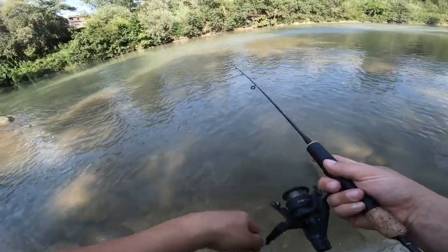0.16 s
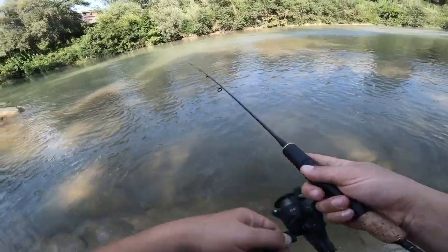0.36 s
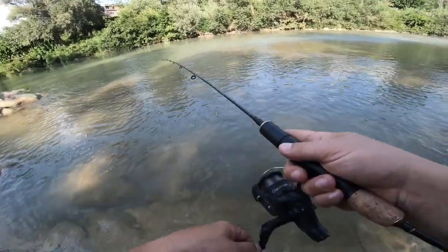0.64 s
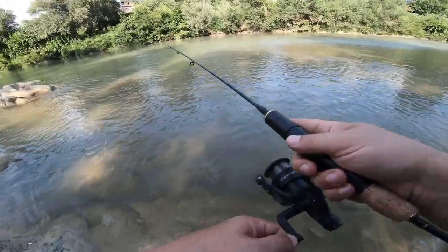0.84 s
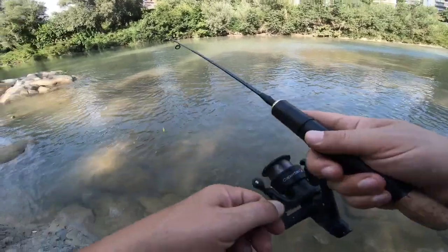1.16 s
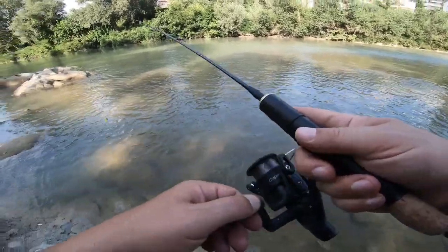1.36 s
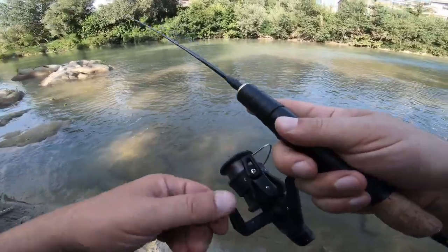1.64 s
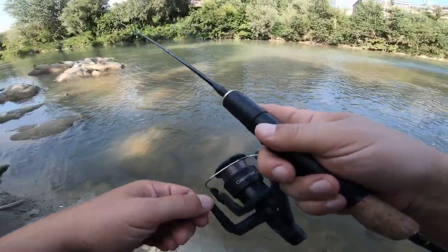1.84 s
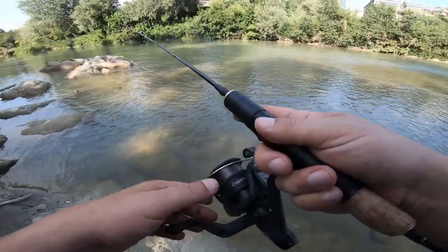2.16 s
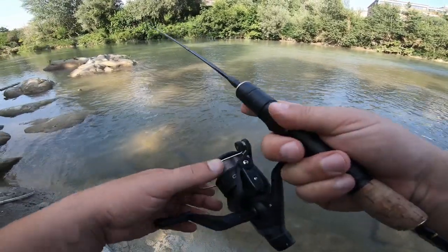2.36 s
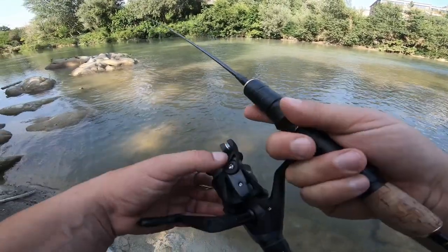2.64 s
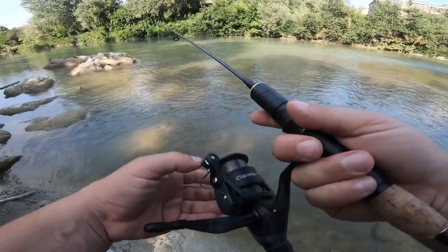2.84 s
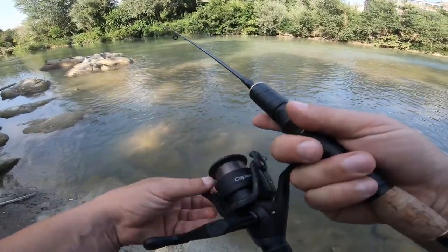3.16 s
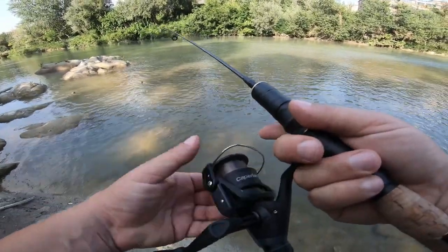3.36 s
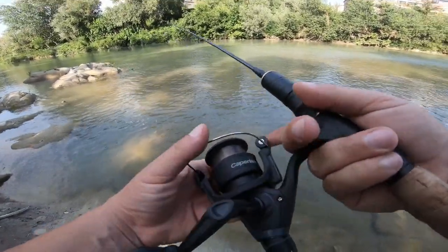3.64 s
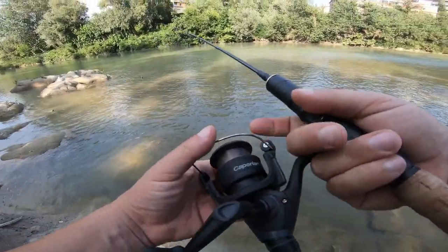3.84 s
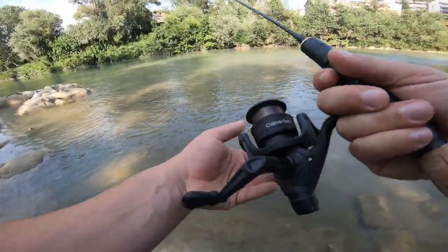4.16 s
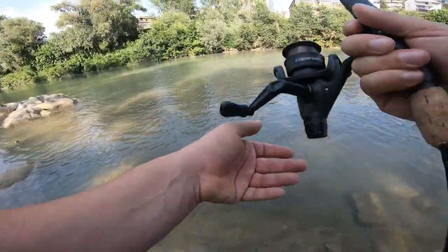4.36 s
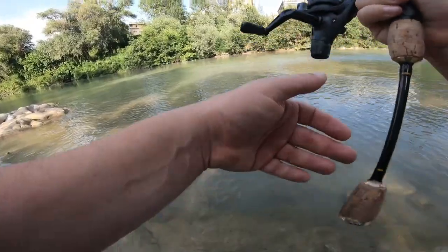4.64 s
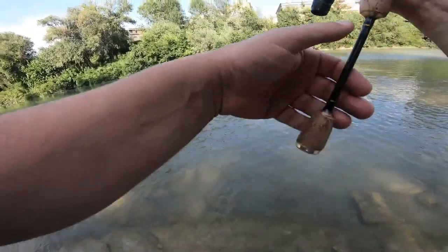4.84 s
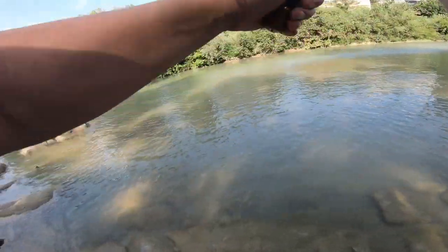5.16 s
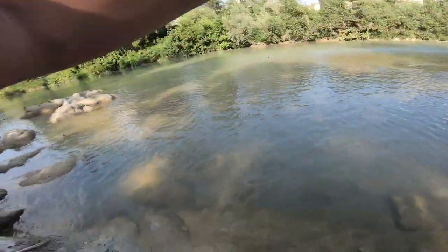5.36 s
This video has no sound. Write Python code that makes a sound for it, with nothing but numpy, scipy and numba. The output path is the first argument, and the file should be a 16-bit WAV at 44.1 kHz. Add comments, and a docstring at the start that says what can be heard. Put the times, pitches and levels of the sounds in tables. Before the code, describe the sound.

Outdoor riverbank heard from a camera worn on the chest, in stereo. A dense high cicada chorus runs throughout, with a nearer cicada pulsing quickly on the left, then swinging right late as the wearer turns. A low river rush and faint breeze sit beneath. A hard knock comes near two seconds, then small reel ticks, a sharp clack just past four, and a cast starting at the very end.

```python
"""A river bank in summer, heard at two microphone ports of a camera worn on the chest.
From the start a far chorus of cicadas drones as resonance-filtered noise and a nearer one throbs over it;
a river rushes low with two wavering hums, a higher singer soon fades out, and a light breeze gusts.
Later a fishing reel clicks as contact bursts ring its modes, and knocks ring the camera case.
Twice the wearer turns; at the very end the swish of a cast, broad filtered noise, begins."""
import sys
import numpy as np
from scipy import signal
from scipy.fft import rfft, irfft, next_fast_len
from scipy.io import wavfile
from scipy.ndimage import uniform_filter1d
from numba import njit

SR = 44100
rng = np.random.default_rng(int(sys.argv[2]) if len(sys.argv) > 2 else 0)


def pcm_store(signal):
    """Save signal as 16-bit PCM."""
    levels = np.round(np.clip(np.atleast_2d(signal), -1, 1) * 32767)
    wavfile.write(sys.argv[1], SR, levels.astype(np.int16).T)


def ratio(d):
    """dB to gain"""
    e = np.asarray(d, float) / 20
    return 10 ** e


N = 242991
T = np.arange(N) / SR  # s
SIZE = next_fast_len(N + SR // 10)  # transform length, padded against wrap-around
F = np.fft.rfftfreq(SIZE, 1 / SR) + 1e-3  # Hz, kept above zero


def level(x, db):
    """Root-mean-square normalisation: scale to a given rms level in dB."""
    return x * ratio(db) / np.sqrt(np.mean(x ** 2))


def table(points):
    """Logarithmic frequency scale: join points linearly along log f."""
    hz, value = np.transpose(points)
    return np.interp(np.log(F), np.log(hz + 1), value)


def curve(rows):
    """Linear interpolation in time of each column of a table."""
    s, *columns = np.transpose(rows)
    return [np.interp(T, s, column) for column in columns]


def ring(hz, width, f=F):
    """Simple resonance: complex response with gain 1 at the centre frequency."""
    return 1 / (1 + 1j * (f / hz - hz / f) * hz / width)


def through(x, response):
    """Linear filtering: convolution is multiplication of spectra."""
    return irfft(rfft(x, SIZE) * response, SIZE)[..., :N]


def walk(rate):
    """Band-limited random fluctuation: held random steps at rate per second, smoothed twice, spread near 1."""
    k = int(SR / rate)
    steps = np.repeat(rng.standard_normal(N // k + 1), k)
    return 1.5 * uniform_filter1d(uniform_filter1d(steps, k), k)[:N]


def pan(db):
    """Interaural level difference: gains for left minus right in dB, split evenly."""
    return ratio(np.array([db, -db]) / 2)


# phase between the ports: f/Hz, lead of the left/rad
PORT_LEAD = [(100, 0.47), (600, -.5), (1290, 2.5), (2330, -0.48), (4500, 0.24), (5200, 1), (6200, 4),
             (8800, 4), (10500, 4.5), (15500, 5)]
# level between the ports: f/Hz, left minus right level/dB
PORT_TILT = [(60, 0), (110, 0), (200, -1), (380, -1), (700, -5.5), (1290, 0), (2380, 0.5), (4400, 2),
             (8120, -0.5), (15000, 7.5)]


def ports():
    """Interchannel transfer: a level difference and a phase lag of the right port at each frequency."""
    half = table(PORT_TILT) / 2
    return np.array([ratio(half), ratio(-half) * np.exp(-1j * table(PORT_LEAD))])


# likeness of the diffuse sound at the two ports: f/Hz, coherence (0-1)
COHERENCE = [(60, 1), (300, 0.93), (600, 0.72), (900, 0.14), (1300, 0.4), (1800, 0.06), (2500, 0.46),
             (4400, 0.57), (5500, 0), (7500, 0.47), (15000, 1)]


def diffuse(colour):
    """Diffuse field: partly coherent coloured noise at the two ports, set to unit rms."""
    alike = np.clip(table(COHERENCE), 0, 1)
    shared, own = rng.standard_normal((2, len(F), 2)) @ np.array([1, 1j])
    both = np.array([shared, alike * shared + np.sqrt(1 - alike ** 2) * own])
    return level(irfft(both * ports() * colour, SIZE)[:, :N], 0)


# body resonances of the far cicadas, each cubed in use: f/Hz, width of one stage/Hz, level/dB
CHORUS_BODIES = [(2484, 1680, -8), (3155, 1060, -12), (4856, 1010, 1.5), (4326, 980, -5), (5474, 960, -1.5),
                 (6860, 2900, -7.5), (10140, 1300, -25), (13200, 2600, -26)]


def chorus(db, pan_db):
    """Incoherent superposition: countless far cicadas blur into noise in their body resonances."""
    power = sum(
        (ratio(gain_db) * np.abs(ring(hz, width)) ** 3) ** 2
        for hz, width, gain_db in CHORUS_BODIES
    )
    return diffuse(np.sqrt(power)) * ratio(db + 0.51 * walk(9)) * pan(pan_db)


# body resonances before the ports, each squared: f/Hz, width of one stage/Hz, level/dB, right over left level/dB
NEAR_BODY = [(2650, 960, -8.5, -14.5), (4897, 710, 3.5, -4), (7180, 973, -7, 6), (9800, 750, -14, -19.5),
             (14000, 900, -24, -6.5)]
# throb pace: t/s, rate/(throbs per s)
THROB_PACE = [(0, 6.549), (.35, 6.739), (.7, 7.043), (1.1, 6.739), (1.5, 6.786), (2.05, 6.332),
              (2.65, 6.914), (3.1, 6.44), (4.1, 6.455), (4.4, 6.728), (4.8, 6.344), (5.51, 6.138)]
# song: t/s, overall level/dB, gain of the resonance near 7 kHz/dB, gain of those above it/dB
SONG = [(0, -46, -4, -0.5), (.5, -45, -6, -5), (.9, -48.5, -11, 1), (1.3, -47, -2, -1), (1.9, -44, -1, 0),
        (2.4, -46, -3.5, 1.5), (2.8, -45.5, -1, 1.5), (3.2, -47, -4, 1.5), (3.7, -43, 0, -6),
        (4.0, -45, -8, -2), (4.4, -42.5, -5.5, -1.5), (4.87, -38.5, -9.5, -11.5), (5.03, -40, -4.5, -7),
        (5.2, -47, 1, 2.5), (5.51, -42.5, 6.5, 0)]
TYMBAL_HZ, TYMBAL_DECAY = 256.4, 0.99  # mean pull rate; decay in pull periods
FIRST_THROB_S, THROB_S, THROB_SCATTER_DB = 0.046, 0.036, 0.8
LEAF_SHARE = 0.91  # power share of the right port's clicks that is scattered off the leaves


def cicada(pan_db):
    """Source and filter: muscle pulls buckle the ribs in click bursts, which ring the body in throbs."""
    phase = np.cumsum(TYMBAL_HZ * (1 + 0.027 * walk(40))) / SR
    pull_strength = ratio(0.69 * rng.standard_normal(N // 50))
    pulls = np.exp(-(phase % 1) / TYMBAL_DECAY) * pull_strength[phase.astype(int)]

    (pace,) = curve(THROB_PACE)
    effort_db, upper_db, top_db = curve(SONG)
    beats = np.cumsum(pace) / SR - pace[0] * FIRST_THROB_S
    nearest = np.rint(beats).astype(int)
    scatter_db = THROB_SCATTER_DB * rng.standard_normal(nearest[-1] + 1)[nearest]
    from_peak_s = np.abs((beats - nearest) / pace)
    throbs = ratio(effort_db + scatter_db) * np.exp(-(from_peak_s / THROB_S) ** 3)

    direct, leaves = rng.standard_normal((2, N))
    right = np.sqrt(1 - LEAF_SHARE) * direct + np.sqrt(LEAF_SHARE) * leaves
    clicks = pulls * np.array([direct, right])
    parts = [
        np.array([[ratio(db)], [ratio(db + right_db)]]) * ring(hz, width) ** 2
        for hz, width, db, right_db in NEAR_BODY
    ]
    low = through(clicks, sum(parts[:2]) * ports())
    upper = through(clicks, parts[2] * ports())
    top = through(clicks, sum(parts[3:]) * ports())
    song = level(low + ratio(upper_db) * upper + ratio(top_db) * top, 0)
    return song * throbs * pan(pan_db)


# spectrum of the rush, relative: f/Hz, spectral level/dB per Hz
RUSH_SPECTRUM = [(53, -45.5), (90, -13), (145, 1), (289, -1.5), (321, -4), (395, -3.5), (427, -3.5),
                 (519, -3), (598, -6), (766, -8), (1090, -11.5), (1630, -15), (2000, -18.5), (2600, -24),
                 (4400, -120)]
# swell: t/s, level/dB, gain of the upper rush over the rest/dB
RUSH_SWELL = [(0, -45.5, 0), (1.1, -46.5, 1.5), (1.5, -46, 0), (2.2, -49.5, 2), (3.2, -48, 1),
              (3.7, -47, 2), (4.4, -49, 0), (4.95, -46.5, -1), (5.25, -47, -0.5), (5.51, -46, -0.5)]
# wavering hums: f/Hz, rms level/dB
HUMS = [(49, -64.5), (300, -60.5)]
UPPER_RUSH_HZ = 567


def river():
    """Amplitude-modulated turbulence noise: two bands lap on their own under a swell, beside two hums."""
    db, upper_db = curve(RUSH_SWELL)
    rush = diffuse(ratio(table(RUSH_SPECTRUM)))
    upper = through(rush, 1 / (1 + (UPPER_RUSH_HZ / F) ** 4))
    lower = (rush - upper) * ratio(0.95 * walk(7.1))
    upper = upper * ratio(upper_db + 0.16 * walk(5.9))
    out = (lower + upper) * ratio(db + 0.5 * walk(3.01))
    for hz, hum_db in HUMS:
        tone = np.sin(2 * np.pi * hz * T + 0.6 * walk(1.5))
        out = out + level(tone * ratio(1.5 * walk(1.3)), hum_db)
    return out


SINGER_HZ, SINGER_WIDTH_HZ, SINGER_DB, SINGER_PAN_DB = 5180, 700, -45.5, -3  # width of one stage
SINGER_STOPS_S, SINGER_FADE_DB_PER_S = 0.62, 32
SINGER_THROBS_PER_S, SINGER_FIRST_S, SINGER_DEPTH_DB = 8.7, 0.081, 2  # swing either side


def singer():
    """Amplitude modulation of resonant noise: a higher, quicker cicada, its throbs blurred by distance."""
    db = SINGER_DB - SINGER_FADE_DB_PER_S * (T - SINGER_STOPS_S).clip(0)
    throbs_db = SINGER_DEPTH_DB * np.cos(2 * np.pi * SINGER_THROBS_PER_S * (T - SINGER_FIRST_S))
    voice = diffuse(ring(SINGER_HZ, SINGER_WIDTH_HZ) ** 2)
    return voice * ratio(db + throbs_db + 0.7 * walk(14.6)) * pan(np.array([SINGER_PAN_DB]))


# steady breeze: t/s, level/dB
BREEZE_LEVEL = [(0, -57.5), (1.2, -58), (1.85, -62), (2.1, -55.5), (2.7, -61), (3.3, -65), (3.7, -63.5),
                (4.5, -60), (5.0, -61), (5.51, -55)]
# single gusts on top of it: t/s, level/dB, half-length/s
GUST_TIMES = [(0.271, -54, 0.026), (0.46, -55, 0.031), (0.701, -43.5, 0.02), (2.199, -61, 0.038),
              (2.944, -51, 0.084), (3.468, -49, .05), (4.874, -57, 0.039), (5.256, -50.5, 0.032),
              (5.5, -58, 0.045)]


def wind():
    """Turbulent pressure fluctuation: low-frequency noise buffets the ports, with short gusts."""
    gusts = sum(ratio(db) * np.exp(-((T - s) / length) ** 2) for s, db, length in GUST_TIMES)
    breeze = ratio(curve(BREEZE_LEVEL)[0] + 1.7 * walk(7.7))
    return diffuse(ring(49.85, 46.0) ** 2) * (breeze + gusts)


# modes, the spool's first: f/Hz, level/dB, free decay time to -60 dB/s
REEL_MODES = [(1110, -5, 0.008), (1820, 3, 0.017), (2190, 6.5, 0.018), (3040, -1.5, 0.005),
              (3650, -5, 0.0076), (4110, 0, 0.0055), (4750, 2, 0.012), (5800, 0, 0.0071), (6480, 3, 0.0104),
              (7010, 2.5, 0.008), (7500, -4.5, 0.009), (9100, -10, 0.0124), (10540, -6, 0.0084),
              (13900, -12, .008)]
# the reel close in front of the ports: f/Hz, lead of the left/rad, left minus right level/dB
REEL_PLACE = [(300, 2, 2), (724, 0, -29), (1470, 2, 5), (2390, 0.2, 1.5), (4420, 0.82, 0), (6650, 1.5, -7),
              (8610, 2.5, -2.5), (11000, 1.5, 1.5), (15000, 0.5, 1.5)]
# short hard snaps: t/s, level/dB, brightest f/Hz, spool gain/dB, left minus right level/dB
REEL_SNAPS = [(1.7561, -53, 6000, -6, 4), (2.1808, -56.5, 8000, 0, -1.5), (2.222, -62, 10000, 3, 1),
              (2.9447, -48.5, 5900, 0, 5), (3.6493, -40, 6100, -20, -1), (3.755, -62, 11000, 0, 2.5),
              (3.9, -62.5, 11000, 0.5, 1), (4.0683, -50, 8150, -6, -1), (4.138, -30, 5300, -21, -2),
              (4.187, -51.5, 4200, -11, 8)]
# duller rattles of loose parts: t/s, level/dB, length/s, brightest f/Hz, spool gain/dB, left minus right level/dB
REEL_RATTLES = [(2.181, -55.5, 0.0033, 1600, -2, -1), (2.944, -52.5, 0.0035, 1950, 8, 3),
                (2.946, -53, .003, 5600, -10, 2), (3.6524, -58, 0.00093, 6400, -15, 0),
                (4.1398, -35, 0.0052, 4600, -2, -1), (4.142, -42, 0.0061, 1900, 2, 4),
                (4.189, -50.5, 0.0049, 2300, 6, -3), (4.192, -50, 0.0037, 3700, 0, -5),
                (4.193, -51.5, .0035, 2250, 9, 2), (5.505, -53, .0029, 2400, -4, -6)]
SNAP_S, GRIP_S = 0.0022, 0.0035  # contact length of a snap; extra time before the hand stops the ring
SPOOL_MODES = 3


def reel():
    """Impact excitation of modes: each click is a short rattle of contacts that rings spool and frame."""
    size, lead_in, smooth = 8192, 256, 120  # samples, samples, spectrum bins
    f = np.fft.rfftfreq(size, 1 / SR) + 1e-3
    modes = [ratio(db) * ring(hz, np.log(1000) / np.pi / t60, f) for hz, db, t60 in REEL_MODES]
    spool = sum(modes[:SPOOL_MODES])
    frame = 0.28 * ring(5200.0, 10000.0, f) + sum(modes[SPOOL_MODES:])

    at, lead, tilt = np.transpose(REEL_PLACE)
    lead = np.interp(np.log(f), np.log(at), lead)
    tilt = np.interp(np.log(f), np.log(at), tilt)
    place = pan(tilt) * np.exp(-1j * lead * np.array([[0], [1]]))

    t = (T[:size] - lead_in / SR).clip(0)
    out = np.zeros((2, N + size))
    clicks = [(s, db, SNAP_S, hz, *rest) for s, db, hz, *rest in REEL_SNAPS]
    clicks += REEL_RATTLES
    for s, db, rattle, hz, spool_db, pan_db in clicks:
        shape = np.exp(-(t / rattle) ** 2) * (1 - np.exp(-t / 0.00018))
        contacts = rfft(rng.standard_normal(size) * shape)
        # sharp contacts have no colour of their own
        contacts = contacts / np.sqrt(uniform_filter1d(np.abs(contacts) ** 2, smooth))
        # and start at once
        contacts = rfft(irfft(contacts, size) * (t > 0))
        body = frame + ratio(spool_db) * spool
        click = irfft(contacts * body * place * ring(hz, 2.26 * hz, f) ** 3, size)
        click = click * np.exp(-(t / (rattle + GRIP_S)) ** 4)  # the hand stops the ring
        i = int(s * SR) - lead_in
        out[:, i:i + size] += level(click, db) * pan(np.array([pan_db]))
    return out[:, :N]


# case modes: f/Hz, decay time to -60 dB/s, gain left, gain right
CASE_MODES = [(1270, 0.03, 1, -1.48), (1650, 0.0116, 0.61, -0.089), (1865, 0.036, 0.13, 0.16)]
# knocks carried into the camera case: t/s, level/dB
CASE_KNOCKS = [(1.7588, -17), (4.811, -27.5), (5.305, -41), (5.5055, -18.5)]


def knocks():
    """Free decay of modes: the case rings briefly, its two lower notes in opposite phase at the ports."""
    t = T[:4096]
    note = np.zeros((2, len(t)))
    for hz, t60, left, right in CASE_MODES:
        mode = np.sin(2 * np.pi * hz * t) * np.exp(-np.log(1000) * t / t60)
        note += np.array([[left], [right]]) * mode
    note *= 1 - np.exp(-t / 0.00029)  # soft onset
    out = np.zeros((2, N + len(t)))
    for s, db in CASE_KNOCKS:
        i = int(s * SR)
        out[:, i:i + len(t)] += ratio(db) * note
    return out[:, :N]


CAST_S, CAST_DB, CAST_RISE_DB_PER_S, CAST_FALL_DB_PER_S = 5.49, -37.5, 1082.5, 218.5  # time and level of peak


def cast():
    """Aerodynamic noise: the rod starts to swish through the air, a broad band rising then falling."""
    rise_db = CAST_RISE_DB_PER_S * (T - CAST_S)
    fall_db = CAST_FALL_DB_PER_S * (CAST_S - T)
    swish = diffuse(ring(1500.0, 6200.0) * ring(1830.0, 9400.0))
    return swish * ratio(CAST_DB + np.minimum(rise_db, fall_db))


# the wearer turns twice: t/s, near cicada left minus right level/dB, chorus level/dB,
# chorus left minus right level/dB
TURNS = [(.6, 1, -42, -1), (1.25, 8.5, -41, 0.5), (4.0, 9.5, -41.5, -0.5), (4.4, 1, -42.5, -1),
         (4.65, -6, -43, 0.16), (4.95, -9, -42.5, 0), (5.15, 0, -43, -1), (5.51, -1, -41.5, -1.5)]


def scene():
    """Linear superposition: all sources add at the two ports."""
    near_pan, far_db, far_pan = curve(TURNS)
    insects = chorus(far_db, far_pan) + cicada(near_pan) + singer()
    return insects + river() + wind() + reel() + knocks() + cast()


# microphone response: f/Hz, level/dB
MIC_RESPONSE = [(9000, 0.68), (10500, -1.5), (11400, -15), (13000, -11.5), (14500, -14), (15300, -27.5),
                (16500, -43.5)]


def microphones(dry):
    """Band limitation and saturation: the top is lost and the sharpest peaks are rounded."""
    return 0.89 * np.tanh(through(dry, ratio(table(MIC_RESPONSE))) / 0.91)


@njit
def follow(x, attack, release):
    """Envelope detection: first-order smoothing with separate rise and fall rates per sample."""
    e, out = 0., np.empty(len(x))
    for i in range(len(x)):
        e += (x[i] - e) * (attack if x[i] > e else release)
        out[i] = e
    return out


def limiter(heard):
    """Dynamic range compression: both channels duck while the followed peak exceeds -21.5 dB."""
    peak = follow(np.abs(heard).max(axis=0), 1 / (0.0036 * SR), 1 / (0.047 * SR))  # 3.6 ms up, 47 ms down
    return heard * np.minimum(1, ratio(-21.5) / (peak + 1e-9)) ** 0.92


def band_limit(x):
    """A steep low-pass at the top of the band."""
    return signal.sosfilt(signal.butter(12, 16500, fs=SR, output="sos"), x)


def record(dry):
    """Signal chain in series: microphones, limiter, then a steep elliptic low-pass at 15.8 kHz."""
    limited = limiter(microphones(dry))
    low_pass = signal.ellip(8, 0.2, 70, 15800, fs=SR, output="sos")
    mix = signal.sosfilt(low_pass, limited)
    return band_limit(mix)


dry = scene()
out = record(dry)
pcm_store(out)
```